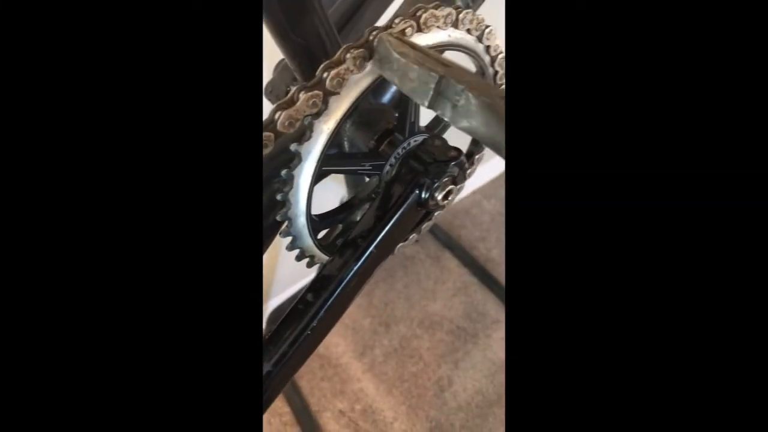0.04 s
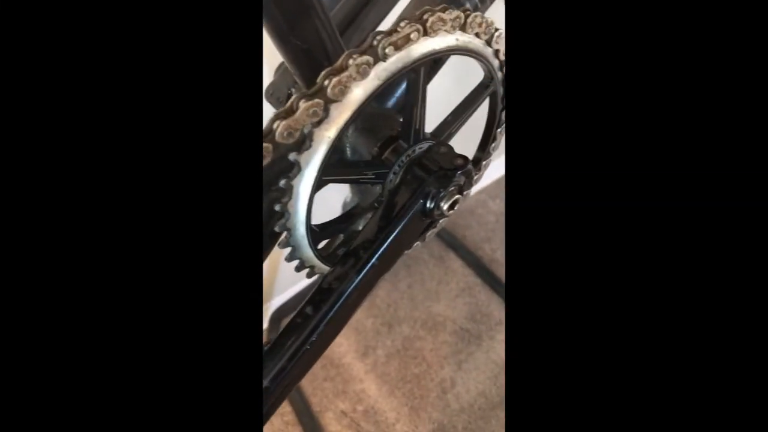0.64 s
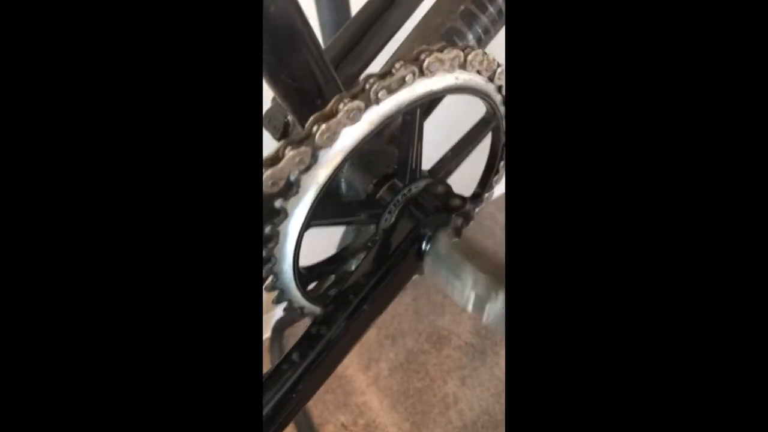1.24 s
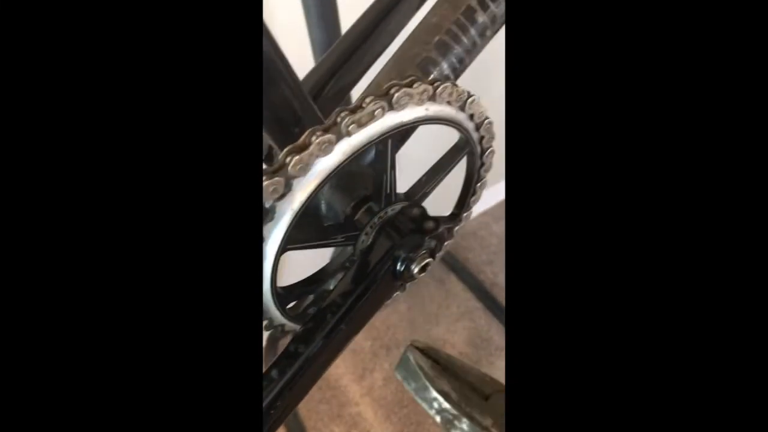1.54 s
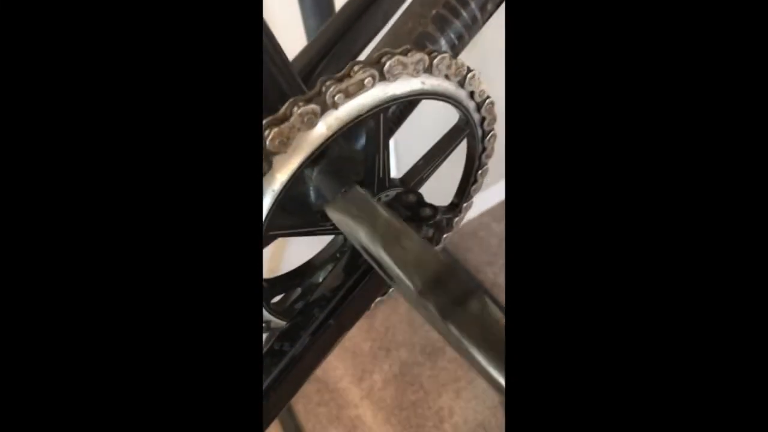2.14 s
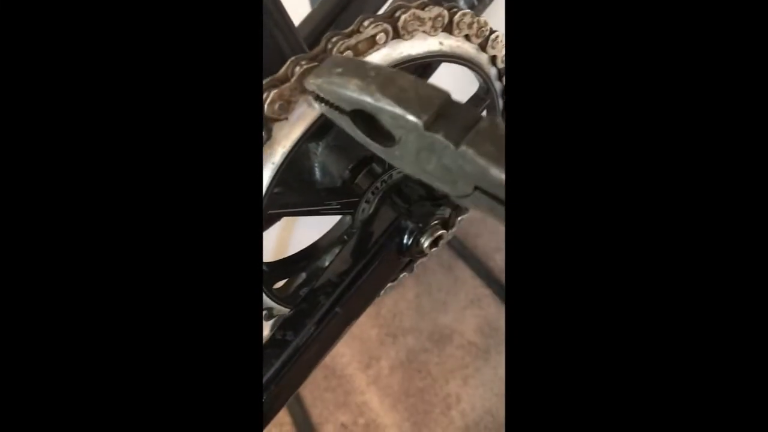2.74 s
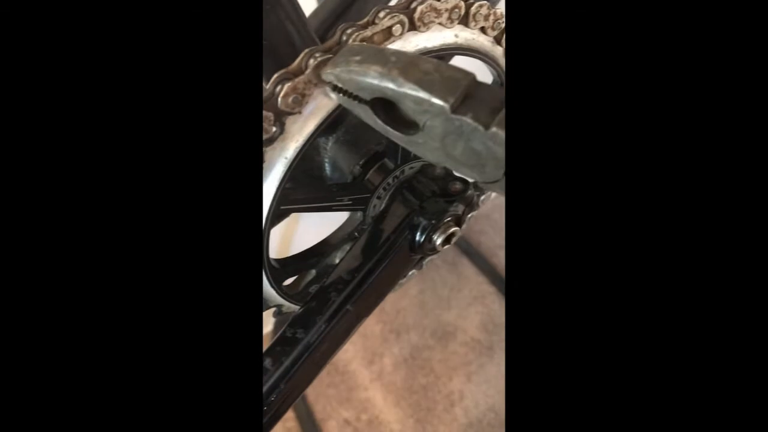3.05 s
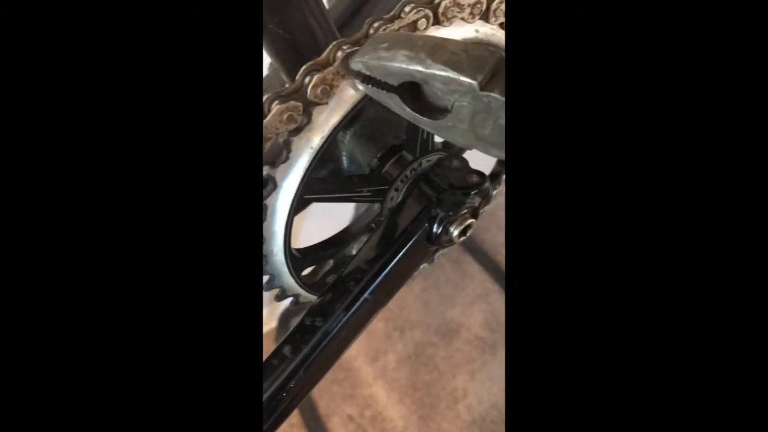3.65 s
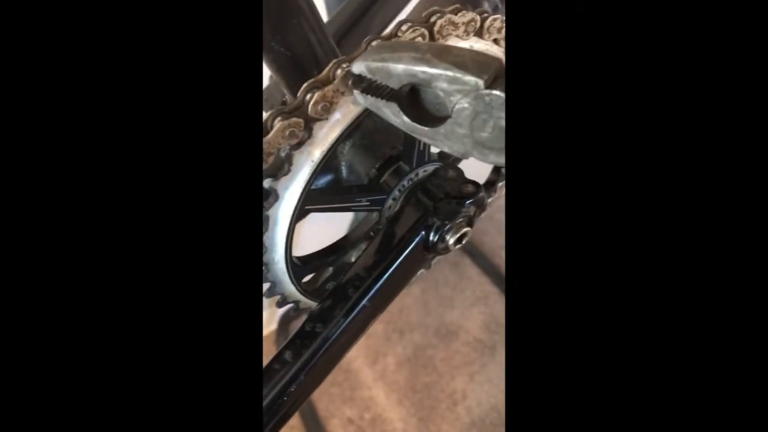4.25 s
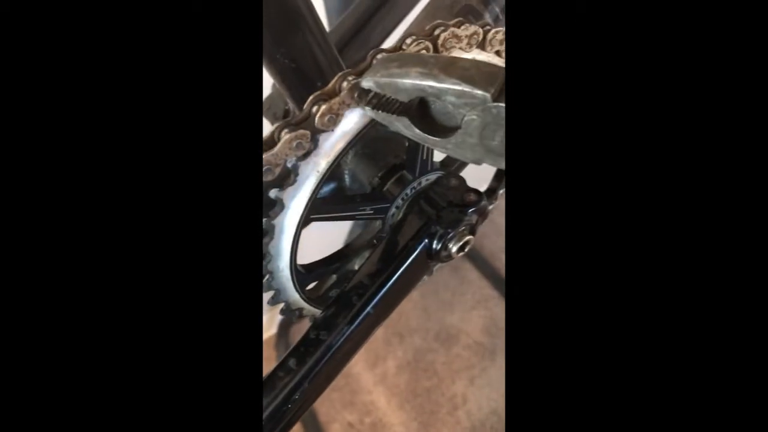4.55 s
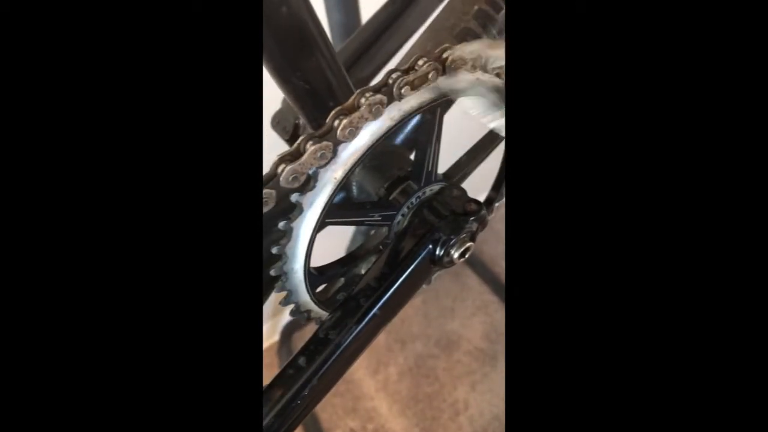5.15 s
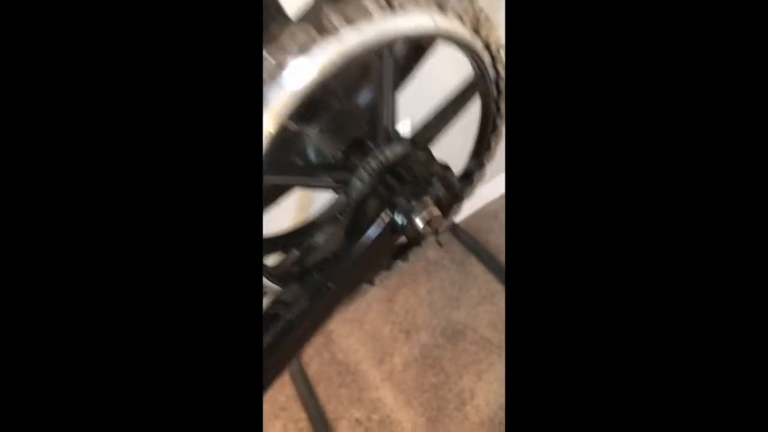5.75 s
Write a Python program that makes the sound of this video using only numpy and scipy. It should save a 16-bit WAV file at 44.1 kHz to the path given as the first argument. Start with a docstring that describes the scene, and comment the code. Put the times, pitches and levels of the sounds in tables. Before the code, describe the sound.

In a small, quiet workshop, pliers tap irregularly on bicycle chain links, close to the microphone. A stretch of faint ticking follows as the jaws hold on, broken by one firmer clink. Near the end the chain is prised free in a quick, loud rasping clatter with a short metallic ring, then come two clicks and soft scrapes. Low hand rumble and a soft room drone lie underneath.

```python
"""Steel pliers pick at a bicycle chain in a small workshop, over quiet room noise and the low rumble
of a hand holding a phone. First the jaws click on the links, ringing them and knocking the frame.
From about 3 s they grip the chain and creep on it with tiny ticks. Just after 5 s the chain is
prised loose, rasps over the teeth and snaps down, leaving the frame and the chainring (the toothed
front wheel) ringing. Two last clicks and a few light slides follow."""
import sys
import numpy as np
from scipy import signal
from scipy.fft import rfft, irfft, next_fast_len
from scipy.io import wavfile
from scipy.ndimage import uniform_filter1d, map_coordinates

SR = 44100
rng = np.random.default_rng(int(sys.argv[2]) if len(sys.argv) > 2 else 0)


def master_out(mix):
    """Clip the mix to full scale and print it as 16-bit PCM to the path in sys.argv[1]."""
    frames = np.transpose(np.atleast_2d(mix))
    ceiling = np.clip(frames, -1, 1)
    pcm = np.round(ceiling * 32767).astype(np.int16)
    wavfile.write(sys.argv[1], SR, pcm)


N = 264159

# Steel hitting steel: (time [s], crack level [dB], crack brightness [dB per octave],
# link pitch [Hz], link ring level [dB], frame knock level [dB])
HITS = [ (0.302, -35, 2.5, 7530, -38.5, -63), (.7360, -26.5, 0.5, 5830, -18, -75),
        (0.7415, -45, -3.5, 6030, -21.5, -58), (1.8780, -46.5, -1.5, 5470, -33.5, -79),
        (2.7854, -36, -0.5, 6040, -29, -53), (2.8986, -46.5, -7, 1420, -55, -58),
        (2.9675, -44.5, -7, 1484, -50, -56.5), (3.5570, -42, 12, 5100, -47.5, -64),
        (3.872, -53, 6, 12200, -59, -69), (3.9035, -48.5, 6, 13100, -54, -68),
        (4.0032, -31, -3, 8810, -26, -41), (5.1016, -45.5, -9.5, 1480, -46.5, -43),
        (5.1228, -21, -3, 1370, -29, -37.5), (5.1428, -17, -0.5, 4430, -19.5, -38),
        (5.1798, -25.5, -0.5, 4700, -19.5, -49.5), (5.1878, -29, 2.5, 6270, -17, -41.5),
        (5.1920, -17.5, 6, 5360, -16, -54), (5.2083, -13.5, 1.5, 5150, -12, -38.5),
        (5.6340, -47, -0.5, 3720, -43, -73), (5.6618, -30.5, 1.5, 3990, -27, -56), ]
# Tone of a steel crack: (frequency [Hz], relative level [dB])
STEEL_TONE = [(200, -5.5), (700, -9.5), (1500, 0), (2200, -4.5), (4200, 4.5), (6500, 1.5), (8500, 2),
              (12000, 0.5), (15500, 3)]
# Notes of one link, damped by its neighbours. A fade time, or t60, is the time to fall by 60 dB.
# (multiple of the link pitch [ratio], relative level [dB], fade time at LINK_REF_HZ [s])
LINK_NOTES = [(.74, -13.5, 0.013), (.92, -9, 0.0093), (1, 1.5, 0.007), (1.07, 1.5, 0.0051),
              (1.86, -14.5, 0.0074)]
# Notes of the frame tubes: (frequency [Hz], relative level [dB], fade time [s])
FRAME_NOTES = [(164, -1.5, 0.097), (223.5, -6, 0.29), (283.2, -3.5, 0.41), (379, 5.5, 0.097),
               (435, -17, 0.086), (495.3, -14, 0.28), (557, -11.5, 0.43), (677, -15, 0.094),
               (822, -24.5, 0.32)]
# Dull thud of crank, wheel and stand: (frequency [Hz], relative level [dB])
THUD_TONE = [(60, -32.5), (150, -12.5), (350, 1.5), (700, -4.5), (1000, -20), (2500, -29.5)]
# Jerks of the chain over the teeth: (time [s], hold [s], friction level [dB])
CHAIN_DRAGS = [(5.111, .010, -43.5), (5.121, 0.026, -36), (5.153, 0.021, -28), (5.186, .011, -31.5),
               (5.204, 0.007, -29)]
# Tone of the rasping chain: (frequency [Hz], relative level [dB])
RASP_TONE = [(59, -42), (100, -14.5), (381, -5.5), (691, -7.5), (768, -5), (1250, 2), (1830, -7.5),
             (2270, 4), (2630, -0.5), (2860, 0.5), (6560, -1), (7140, 5), (7940, -4.5), (12900, -4),
             (16000, -18)]
# The chainring, free to ring once the chain lifts: (frequency [Hz], relative level [dB], fade time [s])
CHAINRING_NOTES = [(1256, -9.5, 0.12), (1445, -15, 1.5), (1543, 8.5, 0.057), (2088, -19, 0.45),
                   (2360, -10.5, 0.11), (2890, 1.5, 0.098), (3014, 6, 0.164), (3230, -12.5, 0.486),
                   (3456, -9, 0.17), (3570, -7, 0.24), (3580, -11, 0.16), (4140, 1, 0.26),
                   (4080, -4.5, 0.126), (4430, -7, .12), (4525, -22, 0.21), (4802, -19, 0.76),
                   (5060, -5.5, .12), (5170, -10, 0.18), (5873, -16.5, .35), (6270, -3, 0.27),
                   (6830, -11.5, 0.145), (6750, -6, 0.16), (7000, -6.5, .13), (10260, -8, 0.098),
                   (13070, -1.5, 0.059), (13600, -2, 0.065)]
# Light slides of jaw and chain: (time [s], level [dB], half length [s], brightness [dB per octave])
LIGHT_SLIDES = [(.663, -65, .012, 7), (1.93, -62, 0.014, 9), (2.068, -68.5, 0.0062, 0),
                (2.32, -72, .012, 2), (3.564, -62, 0.0082, -3.5), (4.444, -64.5, 0.0037, 0),
                (5.664, -57.5, 0.0065, -3), (5.84, -58, .0034, -2), (5.846, -56.5, 0.011, 0.5),
                (5.975, -61, 0.0079, 5.5)]
# Soft bumps of the hand: (time [s], level [dB], half length [s])
HAND_BUMPS = [(0.14, -68.5, .07), (2.823, -56.5, 0.018), (3.60, -63, 0.037), (4.852, -65, 0.042),
              (5.2, -59, 0.083), (5.357, -54.5, 0.02)]
# Tone of the hand's rumble: (frequency [Hz], relative level [dB])
RUMBLE_TONE = [(15, -33), (28, -11), (45, 3.5), (70, 0.5), (120, -5.5), (200, -19), (400, -51), (1000, -77)]
# How long the walls echo: (frequency [Hz], fade time [s])
ECHO_FADES = [(150, 0.19), (500, 0.9), (1500, 0.21), (5000, 0.33), (8000, 0.46), (15000, 0.11)]
# Tone of the echo: (frequency [Hz], relative level [dB])
ECHO_TONE = [(150, 3), (1000, 10), (6000, -1.5), (8500, -14.5), (15000, -5.5)]
# Tone of the room noise: (frequency [Hz], relative level [dB])
ROOM_TONE = [(59, -34), (100, -12.5), (135, -9), (234, -11.5), (266, -2.5), (308, -10), (328, -11.5),
             (415, -15.5), (452, -16), (801, -19.5), (1450, -24.5), (2930, -28), (10900, -34), (13200, -31),
             (16000, -32)]

LINK_REF_HZ = 5900  # a link pitched lower than this rings longer, a higher one shorter


def steel_hits(crack_lead_s=0.002):
    """Each hit of steel on steel cracks, rings a link and knocks the frame."""
    out, t = np.zeros(N), np.arange(SR // 2) / SR
    for s, crack_db, tilt_db, link_hz, link_db, knock_db in HITS:
        add(out, s - crack_lead_s, amp(crack_db) * crack(t, tilt_db, crack_lead_s))
        add(out, s, amp(link_db) * link_ring(t, link_hz) + amp(knock_db) * frame_knock(t))
    return out


def crack(t, tilt_db, lead_s, t60=0.0077, chatter_db=-24, chatter_t60=0.073, smooth_hz=2500):
    """A flurry of tiny collisions makes a sharp crack; pins and rollers chatter faintly after it."""
    fade = amp(-60 * t / t60) + amp(chatter_db - 60 * t / chatter_t60)
    fade = np.pad(fade, (round(lead_s * SR), 0))
    size = len(fade)
    spectrum = rfft(fade * rng.standard_normal(size))
    hz = np.fft.rfftfreq(size, 1 / SR)
    # even out chance peaks and dips, then give it the tone of steel
    local_power = uniform_filter1d(np.abs(spectrum) ** 2, int(smooth_hz / hz[1]))
    even = spectrum / np.sqrt(np.abs(local_power))
    sound = irfft(even * tone_gain(STEEL_TONE, hz, tilt_db), size)
    sound[size // 2:] = 0
    return sound * np.linalg.norm(fade) / np.linalg.norm(sound)


def link_ring(t, link_hz, rise_s=0.00056, wash_db=-37.5, wash_t60=0.15, spread_octaves=0.66):
    """The struck link rings briefly; its neighbours tremble on at nearby pitches in a metallic wash."""
    struck = ring(LINK_NOTES, t, link_hz, damping=(link_hz / LINK_REF_HZ) ** 0.6)
    band = lambda hz: np.exp(-.5 * (np.log2((hz + 1) / link_hz) / spread_octaves) ** 2)
    wash = unit(filtered(rng.standard_normal(len(t)), band))
    neighbours = amp(wash_db - 60 * t / wash_t60) * wash
    return (struck + neighbours) * (1 - np.exp(-t / rise_s))


def frame_knock(t, rise_s=0.0014, thud_db=-2, thud_t60=0.083, tubes_db=-7):
    """The frame tubes ring, while crank, wheel and stand blur into a dull thud."""
    thud = amp(thud_db - 60 * t / thud_t60) * noise(THUD_TONE, len(t))
    tubes = amp(tubes_db) * ring(FRAME_NOTES, t)
    return (thud + tubes) * (1 - np.exp(-t / rise_s))


def chain_slip(catches_per_s=700, rough_db=2.0, rasp_db=-2, frame_db=-18, chainring_db=-14.5):
    """The chain's rollers catch and slip on the teeth, rasping and shaking the frame and chainring."""
    friction = sum(amp(db) * drag_shape(s, hold) for s, hold, db in CHAIN_DRAGS)
    force = friction * unit(amp(rough_db * wobble(catches_per_s)))
    rasp = amp(rasp_db) * force * noise(RASP_TONE, N)
    frame = amp(frame_db) * shaken(FRAME_NOTES, force)
    chainring = amp(chainring_db) * shaken(CHAINRING_NOTES, force)
    return rasp + frame + chainring


def drag_shape(s, hold, rise_s=0.0047, release_t60=0.037):
    """One drag grips quickly at time s, holds, and lets go a little more slowly."""
    t = np.arange(N) / SR - s
    return np.clip(t / rise_s, 0, 1) * amp(-60 * np.maximum(t - hold, 0) / release_t60)


def slides(grains_per_s=900, rough_db=3):
    """Steel sliding lightly on steel gives a short grainy hiss."""
    grain = unit(amp(rough_db * wobble(grains_per_s)))
    hiss = sum(amp(db) * swell(s, half) * noise(STEEL_TONE, N, tilt_db)
               for s, db, half, tilt_db in LIGHT_SLIDES)
    return grain * hiss


def grip_ticks(count=36, from_s=3.1, to_s=5.05, level_db=-67, spread_db=3, t60=0.035):
    """The ridged jaws creep on the links they hold, making tiny ticks."""
    t = np.arange(SR // 10) / SR
    times = rng.uniform(from_s, to_s, count)
    sizes = amp(spread_db * np.clip(rng.standard_normal(count), -2, 2))
    loudness = np.zeros(N)
    for s, size in zip(times, sizes):
        add(loudness, s, size * amp(-60 * t / t60))
    return amp(level_db) * loudness * noise(STEEL_TONE, N)


def hand_rumble(level_db=-72, drift_db=1.9, drifts_per_s=4):
    """The hand on the phone rumbles and now and then bumps it."""
    steady = amp(level_db + drift_db * wobble(drifts_per_s))
    bumps = sum(amp(db) * swell(s, half) for s, db, half in HAND_BUMPS)
    return (steady + bumps) * noise(RUMBLE_TONE, N)


def wall_echo(x, delay_s=0.005):
    """The walls throw the sound back; each frequency dies away at its own speed."""
    hz, t, hiss = signal.stft(rng.standard_normal(SR * 3 // 4), SR, nperseg=256)
    fade = amp(along(ECHO_TONE, hz)[:, None] - 60 * t / along(ECHO_FADES, hz)[:, None])
    tail = signal.istft(hiss * fade, SR, nperseg=256)[1]
    tail = np.pad(tail / np.linalg.norm(tail), (round(delay_s * SR), 0))
    return signal.fftconvolve(x, tail)[:N]


def room_noise(level_db=-67, drone_hz=272, drone_width_hz=22, drone_db=-75):
    """Soft, steady noise with a low drone in it."""
    drone = filtered(rng.standard_normal(N), lambda hz: 1 / (1 + ((hz - drone_hz) / drone_width_hz) ** 2))
    return amp(level_db) * noise(ROOM_TONE, N) + amp(drone_db) * unit(drone)


def ring(notes, t, pitch=1, damping=1):
    """The fading notes of a struck object, at slightly new strengths for every blow."""
    return sum(amp(db + rng.standard_normal() - 60 * damping * t / t60) * np.sin(2 * np.pi * pitch * f * t)
               for f, db, t60 in notes)


def shaken(notes, force):
    """An object rings as a force scrapes it at random."""
    body = ring(notes, np.arange(SR * 3 // 4) / SR)
    return signal.fftconvolve(force * rng.standard_normal(N), body / np.linalg.norm(body))[:N]


def amp(db):
    """Turn decibels into a gain."""
    return 10 ** (np.asarray(db) / 20)


def unit(x):
    """Scale to an average strength (rms) of 1."""
    return x / np.sqrt(np.mean(x ** 2) + 1e-20)


def along(points, hz):
    """Read between (frequency, value) points, spaced by octaves."""
    f, v = np.transpose(points)
    return np.interp(np.log(hz + 1), np.log(f + 1), v)


def tone_gain(tone, hz, tilt_db):
    """Gains from a tone table, brightened by tilt_db for each octave above 1000 Hz."""
    return amp(along(tone, hz) + tilt_db * np.log2(np.maximum(hz, 1000)))


def filtered(x, response):
    """Turn each frequency of x up or down by response(hz)."""
    size = next_fast_len(len(x) + 8192)
    return irfft(rfft(x, size) * response(np.fft.rfftfreq(size, 1 / SR)), size)[:len(x)]


def noise(tone, size, tilt_db=0):
    """Noise of strength 1 with the given tone."""
    return unit(filtered(rng.standard_normal(size), lambda hz: tone_gain(tone, hz, tilt_db)))


def wobble(rate):
    """A smooth curve through `rate` random points a second."""
    return map_coordinates(rng.standard_normal(int(N * rate / SR) + 4), [np.arange(N) * rate / SR])


def swell(s, half):
    """A bell-shaped rise and fall around time s."""
    return np.exp(-.5 * ((np.arange(N) / SR - s) / half) ** 2)


def add(track, s, sound):
    """Mix a sound into the track at time s."""
    part = track[round(s * SR):][:len(sound)]
    part += sound[:len(part)]


def scene(echo_db=-18.5):
    """The bicycle is close, so its echo is faint; hand and room noise lie underneath."""
    bicycle = steel_hits() + chain_slip() + slides() + grip_ticks()
    return (bicycle + amp(echo_db) * wall_echo(bicycle) + hand_rumble() + room_noise())[None]


def record(dry, top_hz=16000):
    """The phone keeps nothing above top_hz."""
    return np.array([filtered(x, lambda hz: hz < top_hz) for x in dry])


dry = scene()
out = record(dry)
master_out(out)
```